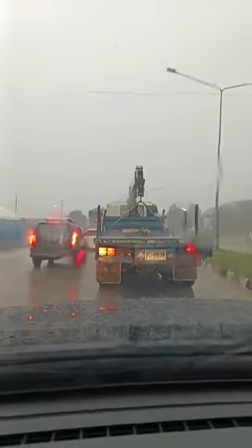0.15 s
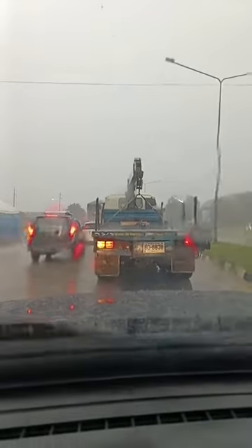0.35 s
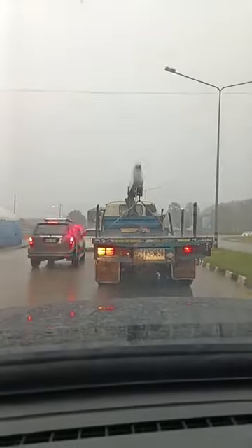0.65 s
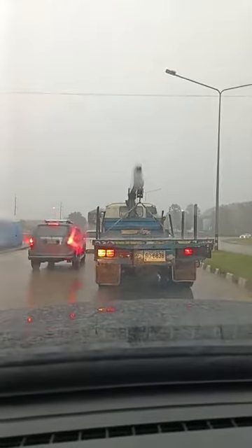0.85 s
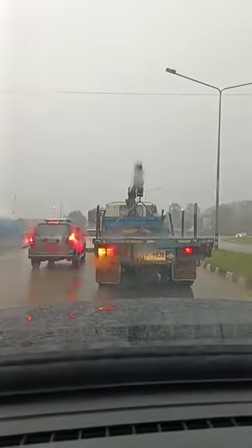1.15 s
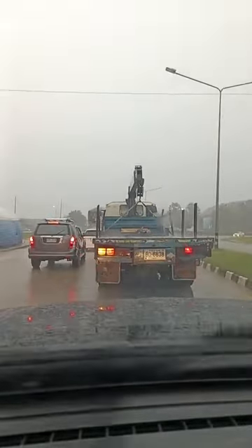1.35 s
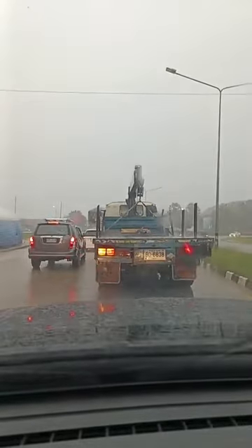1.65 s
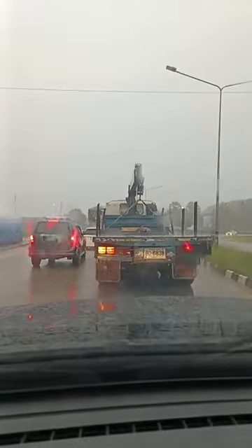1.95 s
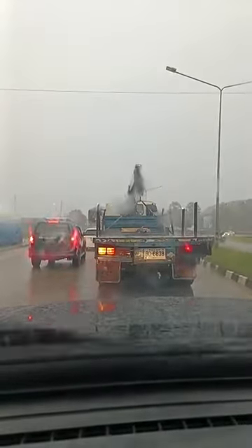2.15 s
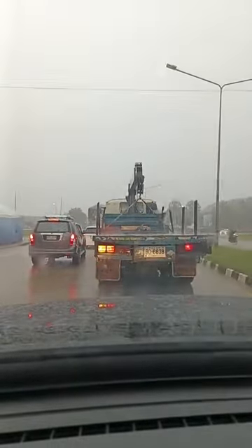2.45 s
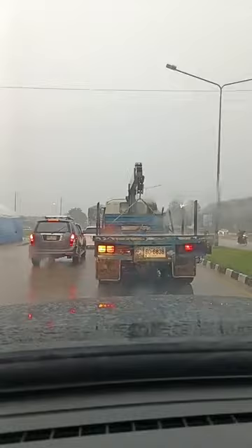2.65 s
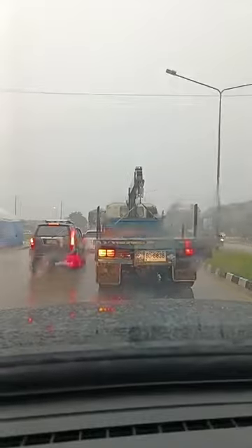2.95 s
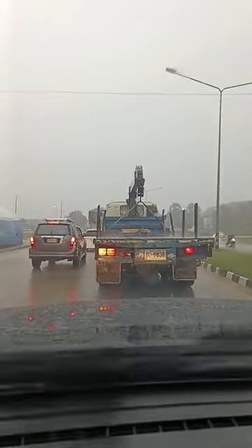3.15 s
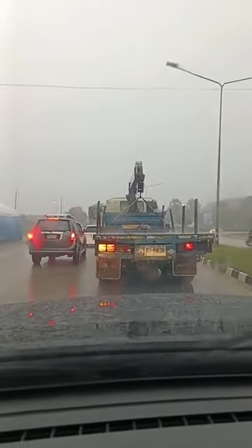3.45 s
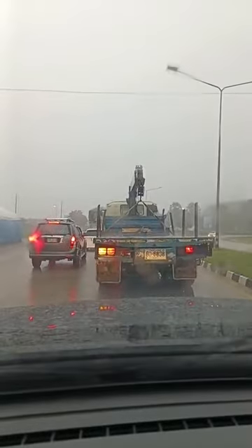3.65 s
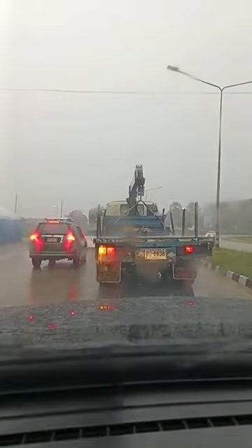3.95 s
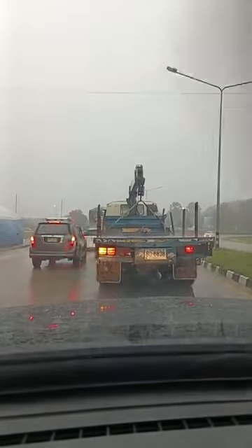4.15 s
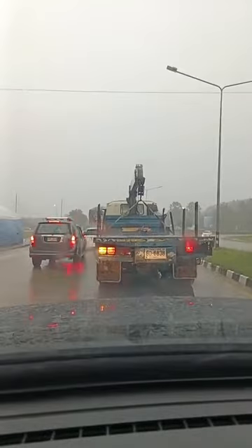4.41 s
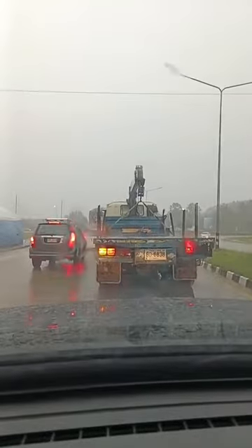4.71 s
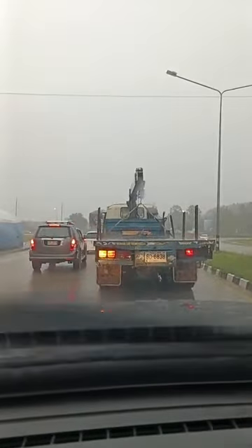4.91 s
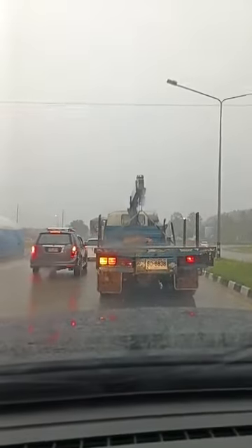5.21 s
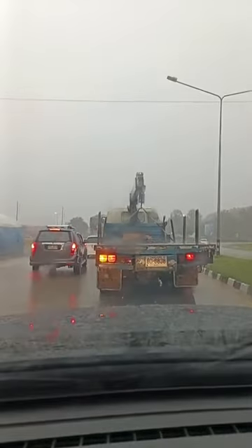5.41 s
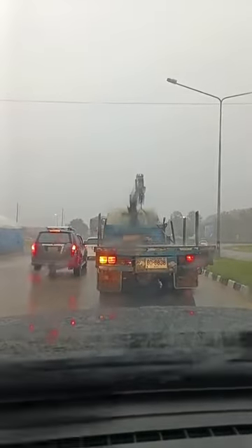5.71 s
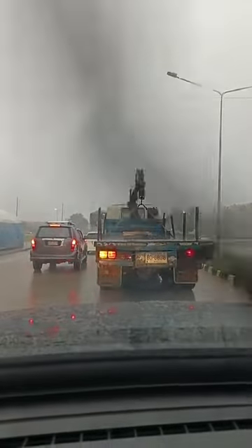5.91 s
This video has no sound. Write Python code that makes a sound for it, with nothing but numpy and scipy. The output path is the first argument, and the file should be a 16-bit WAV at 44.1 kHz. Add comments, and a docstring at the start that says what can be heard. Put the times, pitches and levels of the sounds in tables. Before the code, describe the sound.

Inside a car cabin in slow traffic, heavy rain drums dully on the lined roof while brighter patter covers the windscreen. Fat drops splat and knock, a few ring the roof skin or ping the glass. Wipers thump softly in a cycle just under two seconds long. A low engine hum and road rumble lie underneath. About halfway, a motorbike drones past, dropping in pitch and fading. One close microphone at the front seat, mono.

```python
"""Rain from the front seat

Heavy rain inside a car that creeps along in traffic, heard by one microphone at the front seat.
Filtered random impacts drum on the lined roof overhead and patter on the windscreen ahead.
Light drops ring notes of the roof skin; fat ones burst into splats, and hard ones ping the glass.
Wiper thumps are short sine booms with a rub of noise; the engine is a wavering sine over road noise.
A motorbike, a gliding sine, drones past the other way."""
import sys
import numpy as np
from scipy import signal
from scipy.fft import rfft, irfft, next_fast_len
from scipy.io import wavfile

SR = 44100
rng = np.random.default_rng(int(sys.argv[2]) if len(sys.argv) > 2 else 0)


def wav_out(sig):
    """Save sig, one row per channel (or a flat mono array), as 16-bit PCM at SR to the path in sys.argv[1]."""
    wavfile.write(sys.argv[1], SR, np.round(np.clip(np.atleast_2d(sig).T, -1, 1) * 32767).astype(np.int16))


N = 267687
TIME = np.arange(N) / SR

# strength of the downpour, guiding patter and drumming: (time [s], relative level [dB])
DOWNPOUR = [(0.0, -38.5), (0.49, -38.5), (1.4, -38), (2.64, -39), (3.08, -37), (3.92, -39), (4.24, -38),
            (6.07, -41)]
# how roof and glass sound from the seat: (frequency [Hz], relative density [dB per Hz])
ROOF_COLOUR = [(110, -23.5), (160, -12.5), (200, -2), (240, -6.5), (268, -10.5), (305, -8), (390, -15),
               (480, -14), (620, -10), (800, -16.5), (1270, -21), (1720, -20), (1830, -26.5), (2300, -34.5)]
GLASS_COLOUR = [(900, -4), (1750, -0.5), (2150, -2), (2800, -4), (3300, -2), (5300, -3), (5950, 1.5),
                (6950, -7.5), (7300, -25), (8150, -16.5), (9600, -26), (12000, -23.5), (13300, -22),
                (15500, -33)]
# resonances of the roof skin and of the windscreen: (frequency [Hz], width [Hz], lift [dB])
ROOF_MODES = [(570, 28, 2.5), (706, 12, 0), (960, 35, 5), (1175, 124, 4), (1432, 93, 5)]
GLASS_MODES = [(3456, 55, 5.1), (3744, 71, 5.2), (4300, 98, 3.2)]
# colour of the finest droplets and of small hard drops: (frequency [Hz], relative density [dB per Hz])
TICK_COLOUR = [(6000, -8), (8200, 10), (10500, -5), (13000, -3), (15600, -6)]
PING_COLOUR = [(3000, -12), (5300, -6), (5900, 7), (6600, 0.5), (7300, -22.5)]
ROOF_DB, ROOF_FOLLOWS = -28, 0.46       # drumming at mean strength; share of the downpour's swing it follows
PATTER_DB, PINGS_DB = 0.5, -10.5        # patter and small hard drops, relative to the downpour

# drops that ring one note of the roof skin: (time [s], peak level [dB], pitch [Hz])
ROOF_TAPS = [(0.811, -23, 565), (1.777, -28, 668), (2.818, -22, 1540), (2.896, -21, 1600),
             (3.101, -36, 611), (3.305, -25, 635), (4.192, -26, 714)]
TAPS_PER_S, TAPS_DB, TAP_T60_S = 110, -44.5, 0.055    # lighter taps at random; ring time of every tap

ENGINE_HZ, ENGINE_DB = 54.04, -30.5     # mean firing rate at idle and its mean level in the cabin
# colour of the road: (frequency [Hz], relative density [dB per Hz])
ROAD_COLOUR = [(15, -6.5), (25, -13), (33, -6), (46, -2), (68, 0), (95, -3.5), (130, -1), (180, -6.5),
               (300, -31), (700, -45)]

# fat drops, each with the mix of the spot where it lands, as relative levels:
# (time [s], base length [s], thud [dB], knock [dB], splash [dB], spray [dB])
SPLATS = [(0.312, 0.019, -33, -34.5, -38, -60), (0.908, 0.027, -28.5, -43, -33.5, -50.5),
          (0.981, 0.025, -28, -31.5, -33, -51), (1.288, 0.033, -29, -35, -38, -60),
          (1.629, .026, -31, -33, -34, -53.5), (1.903, 0.052, -31, -33.5, -35, -49),
          (2.222, 0.019, -23, -32.5, -41, -60), (2.59, 0.025, -24, -27, -34, -61),
          (2.818, 0.021, -25.5, -29.5, -37, -56), (2.88, 0.033, -25, -35, -33, -56),
          (2.93, 0.032, -21, -27.5, -30.5, -53), (3.376, 0.024, -25, -30, -29.5, -62),
          (4.006, 0.017, -30, -40, -32, -56), (4.041, 0.028, -27, -39, -46, -58),
          (4.4, 0.047, -28, -33, -37.5, -55), (4.483, 0.022, -33, -37, -39, -60),
          (5.463, 0.028, -31, -32.5, -34, -45)]
# light drops that only spit on the glass: (time [s], relative spray level [dB])
SPITS = [(0.087, -52), (0.164, -50), (1.407, -48), (2.862, -49), (3.462, -49), (4.368, -52), (4.943, -53),
         (5.759, -47.5)]
# colour of a fat drop's thud, knock and fine spray: (frequency [Hz], relative density [dB per Hz])
THUD_COLOUR = [(130, 0), (230, 11), (305, 12), (420, 3.5), (620, 10.5), (800, 2.5), (1000, -3)]
KNOCK_COLOUR = [(650, -12), (900, 2), (1300, 4), (1680, 3.5), (1900, -5.5), (2500, -17)]
SPRAY_COLOUR = [(6000, -35), (8000, 10), (10300, -8), (12800, 8), (15600, 5)]
SPIT_S, SPIT_SPLASH_DB = 0.028, 7       # base length of a spit; its splash relative to its spray

# wiper cycles: (start time [s], strength [dB], extra rub of the first flip [dB])
WIPER_CYCLES = [(0.28, 0.5, -2), (2.078, 0.5, 2), (3.93, -0.5, 4), (5.742, 1, 0)]
# thumps of every cycle, levels before the cycle's own strength:
# (time into the cycle [s], boom [dB], pitch [Hz], half length [s], rubber rub [dB])
WIPER_THUMPS = [(-0.14, -34.5, 216, .02, -47), (-0.012, -26.5, 127, 0.024, -26.5),
                (0.02, -24, 73, 0.023, -34.5), (0.092, -26.5, 76, 0.017, -35), (0.673, -22, 85, 0.024, -33),
                (0.68, -28.5, 205.4, 0.032, -46), (0.934, -27, 99, 0.022, -36),
                (1.287, -21.5, 120, .019, -36), (1.316, -33, 74.4, .018, -37)]
# colour of the wiper rubber: (frequency [Hz], relative density [dB per Hz])
RUBBER_COLOUR = [(35, -32.5), (70, 5.5), (140, 3.5), (250, -2.5), (440, -6.5), (600, -16), (900, -33.5)]
FIRST_FLIP_S = 0.05                     # thumps this near the cycle's start belong to the first flip

# hardest single drops that stand out of the patter: (time [s], relative level [dB])
HARD_DROPS = [(0.783, -33), (0.918, -35), (2.864, -28), (3.170, -29), (3.498, -30), (5.222, -30.5),
              (5.395, -30)]
HARD_DROP_DB = 19.5                     # how strongly the glass answers a hard drop

PASS_S, PASS_GLIDE_S = 2.98, 0.157      # the motorbike goes by; time scale of its drop in pitch
APPROACH_HZ, LEAVE_HZ = 206.4, 164.2    # its mean exhaust note before and after
BIKE_DB, BIKE_LOUDEST_S = -32.5, 2.8    # it is loudest while it still faces the windscreen
BIKE_RISE_DB_PER_S, BIKE_FADE_DB_PER_S = 58, 4.5

CUTOFF_HZ = 15750


def from_db(db):
    """Decibels to gain."""
    return 10 ** (np.asarray(db) / 20)


def rms_one(x):
    """Scale to unit power."""
    return x / np.sqrt(np.mean(x ** 2) + 1e-20)


def in_time(rows):
    """Each column of a curve table at every sample."""
    s, *columns = np.transpose(rows)
    return [np.interp(TIME, s, c) for c in columns]


def drift(rate):
    """Slow chance with spread 1, changing about rate times a second."""
    hz = np.arange(N // 2 + 1) * SR / N
    spectrum = rfft(rng.standard_normal(N)) / (1 + (hz / rate) ** 4)
    return rms_one(irfft(spectrum, N))


def coloured(x, spectrum):
    """Causal filter with this spectrum, falling away past its ends; white input keeps its power."""
    size = 2 * next_fast_len(N)
    octave = np.log2(np.maximum(np.arange(size // 2 + 1) * SR / size, 1))
    hz, level_db = np.transpose(spectrum)
    outside = np.abs(octave - np.clip(octave, np.log2(hz[0]), np.log2(hz[-1])))
    curve_db = np.interp(octave, np.log2(hz), level_db) - 24 * outside    # 24 dB per octave past the ends
    gain = rms_one(from_db(curve_db))
    cepstrum = irfft(np.log(gain))[:size // 2]
    cepstrum[1:] *= 2       # minimum phase: nothing rings before its cause
    return irfft(rfft(x, size) * np.exp(rfft(cepstrum, size)))[:N]


def resonant(x, modes):
    """Each mode rings on after an impact and lifts its own pitch."""
    total = x
    for hz, width, lift_db in modes:
        b, a = signal.iirpeak(hz, hz / width, fs=SR)
        total = total + (from_db(lift_db) - 1) * signal.lfilter(b, a, x)
    return total


def drops(per_s, spread_db):
    """Random impacts at unit power; positive spread: many small, few large; negative: the reverse."""
    at = np.flatnonzero(rng.random(N) < per_s / SR)
    size, sign = rng.random((2, N))[:, at]
    height_db = spread_db * np.minimum(-np.log(size), 4.5)
    clicks = np.zeros(N)
    clicks[at] = from_db(height_db) * np.sign(sign - 0.5)
    return rms_one(clicks)


def cabin(x, t60, wet_db):
    """Direct sound plus the short, dense reflections between the windows; power is kept."""
    age = TIME[:SR // 10]
    echoes = rng.standard_normal(len(age)) * from_db(-60 * age / t60)
    response = from_db(wet_db) * echoes / np.sqrt(np.sum(echoes ** 2))
    response[0] += 1
    return signal.fftconvolve(x, response / np.sqrt(np.sum(response ** 2)))[:N]


def panel(per_s, spread_db, t60, wet_db, count=8):
    """Rain on a panel: every spot reaches the ear along reflections of its own."""
    spots = (cabin(drops(per_s / count, spread_db), t60, wet_db) for spot in range(count))
    return rms_one(sum(spots))


def rain():
    """Dull drumming through the roof lining, bright patter through the glass, and lone sharp ticks."""
    downpour_db, = in_time(DOWNPOUR)
    roof_db = ROOF_DB + ROOF_FOLLOWS * (downpour_db - downpour_db.mean())
    flurry = drift(9.0)      # drops arrive in clumps
    shared = panel(per_s=900, spread_db=4.0, t60=0.03, wet_db=4.0)    # drops on the glass shake the body too
    roof = panel(per_s=4000, spread_db=2.5, t60=0.064, wet_db=7, count=12) + from_db(-7) * shared
    glass = panel(per_s=6000, spread_db=3.0, t60=0.062, wet_db=-4.5, count=4) + from_db(-5.5) * shared
    ticks = panel(per_s=260, spread_db=3.5, t60=0.027, wet_db=5, count=4)
    # small hard drops ring only the highest note of the glass
    pings = panel(per_s=260, spread_db=4.0, t60=0.012, wet_db=-11.0, count=4)

    drumming = coloured(resonant(rms_one(roof), ROOF_MODES), ROOF_COLOUR)
    drumming *= from_db(roof_db + 0.8 * flurry)
    glass = rms_one(glass + from_db(-14.5) * ticks)
    patter = coloured(resonant(glass, GLASS_MODES), GLASS_COLOUR)
    patter *= from_db(downpour_db + PATTER_DB + 0.82 * flurry)
    fine_ticks = coloured(ticks, TICK_COLOUR) * from_db(-63.0)
    hard_pings = coloured(pings, PING_COLOUR) * from_db(downpour_db + PINGS_DB)
    return drumming + patter + fine_ticks + hard_pings


def ring(clicks, hz, t60):
    """A unit click sets a decaying sine of starting height 1 ringing."""
    r = from_db(-60 / (t60 * SR))    # decay per sample
    w = 2 * np.pi * hz / SR
    return signal.lfilter([0, np.sin(w)], [1, -2 * r * np.cos(w), r * r], clicks + 1e-18)


def roof_taps(low_hz=520, high_hz=1750, count=22):
    """Every spot of the roof skin has a short note of its own, which a heavier drop rings."""
    light, heavy = np.zeros((2, N))
    for hz in np.geomspace(low_hz, high_hz, count):
        light += ring(drops(TAPS_PER_S / count, spread_db=1.5), hz, TAP_T60_S)
    for s, peak_db, hz in ROOF_TAPS:
        click = signal.unit_impulse(N, round(s * SR))
        heavy += from_db(peak_db) * ring(click, hz, TAP_T60_S)
    return from_db(TAPS_DB) * rms_one(light) + heavy


def engine():
    """The firing note booms in the cabin over the rumble of tyres and traffic."""
    phase = 2 * np.pi * ENGINE_HZ * TIME + 0.3 * drift(0.69)
    hum = from_db(ENGINE_DB + 0.28 * drift(11.0)) * np.sqrt(2) * np.sin(phase)
    road = from_db(-31.5) * coloured(rng.standard_normal(N), ROAD_COLOUR)
    return hum + road


def splats(rise_s=0.0014, splash_share=0.7, spray_share=0.42, slap=0.47, slap_s=0.003):
    """A fat drop scatters into quick droplets: the body thuds, the glass knocks, splashes and sprays."""
    def scatter(s, length_s):
        """Density of landing droplets: a quick rise, then a fall after length_s."""
        age = np.maximum(TIME - s, 0)
        return (1 - np.exp(-age / rise_s)) / (1 + (age / length_s) ** 4)

    thud, knock, splash, spray = np.zeros((4, N))
    for s, length_s, thud_db, knock_db, splash_db, spray_db in SPLATS:
        landing = scatter(s, length_s) + slap * scatter(s, slap_s)     # the first contact is the hardest
        thud += from_db(thud_db) * landing
        knock += from_db(knock_db) * landing
        splash += from_db(splash_db) * scatter(s, splash_share * length_s)
        spray += from_db(spray_db) * scatter(s, spray_share * length_s)
    for s, spray_db in SPITS:
        splash += from_db(spray_db + SPIT_SPLASH_DB) * scatter(s, SPIT_S)
        spray += from_db(spray_db) * scatter(s, spray_share * SPIT_S)

    droplets = drops(per_s=3000, spread_db=0.5)
    burst = coloured(thud * droplets, THUD_COLOUR) + coloured(knock * droplets, KNOCK_COLOUR)
    splashes = splash * drops(per_s=5600, spread_db=-0.5)
    burst += coloured(resonant(splashes, GLASS_MODES), GLASS_COLOUR)
    # seats and lining soak up the reflections of the fine spray
    fine = coloured(spray * drops(per_s=9400, spread_db=-1.0), SPRAY_COLOUR)
    return cabin(burst, t60=0.081, wet_db=-18.0) + fine


def wipers(waver=0.72):
    """Each flip of the blades sets the windscreen booming for a moment, with a dull rub of rubber."""
    boom, rub = np.zeros((2, N))
    judder = waver * drift(39)    # phase wander [rad]
    for start_s, strength_db, flip_db in WIPER_CYCLES:
        phases = rng.random(len(WIPER_THUMPS))    # in turns
        for (after_s, boom_db, hz, half_s, rub_db), phase in zip(WIPER_THUMPS, phases):
            near = np.abs(TIME - start_s - after_s) < 5 * half_s
            lag = TIME[near] - start_s - after_s
            push = from_db(strength_db) * np.exp(-0.5 * (lag / half_s) ** 2)
            tone = np.sqrt(2) * np.sin(2 * np.pi * (hz * lag + phase) + judder[near])
            boom[near] += from_db(boom_db) * push * tone
            extra_db = flip_db * (abs(after_s) < FIRST_FLIP_S)
            rub[near] += from_db(rub_db + extra_db) * push
    return boom + rub * coloured(rng.standard_normal(N), RUBBER_COLOUR)


def hard_drops():
    """Single drops right in front of the seat ping the windscreen."""
    clicks = np.zeros(N)
    for s, level_db in HARD_DROPS:
        clicks[round(s * SR)] = from_db(level_db)
    return from_db(HARD_DROP_DB) * cabin(coloured(clicks, PING_COLOUR), t60=0.018, wet_db=7)


def motorbike():
    """Only the lowest exhaust note passes the windows; it swells, drops in pitch going by, and fades."""
    gone_by = 0.5 + 0.5 * np.tanh((TIME - PASS_S) / PASS_GLIDE_S)
    hz = APPROACH_HZ + (LEAVE_HZ - APPROACH_HZ) * gone_by
    since = TIME - BIKE_LOUDEST_S
    level_db = BIKE_DB + np.minimum(BIKE_RISE_DB_PER_S * since, -BIKE_FADE_DB_PER_S * since)
    phase = 2 * np.pi * np.cumsum(hz * (1 + 0.0061 * drift(7.7))) / SR
    return from_db(level_db + 0.85 * drift(11)) * np.sqrt(2) * np.sin(phase)


def scene():
    """Everything as heard from the front seat, in one channel."""
    mix = rain() + roof_taps() + engine() + splats() + wipers() + hard_drops() + motorbike()
    return mix[None]


def record(dry):
    """A steep elliptic low-pass cuts the top."""
    low_pass = signal.ellip(14, 0.1, 90, CUTOFF_HZ, fs=SR, output="sos")
    return signal.sosfilt(low_pass, dry)


dry = scene()
out = record(dry)
wav_out(out)
```